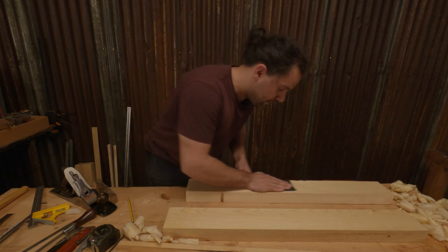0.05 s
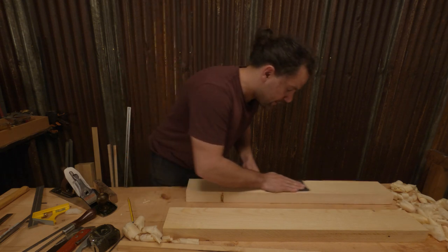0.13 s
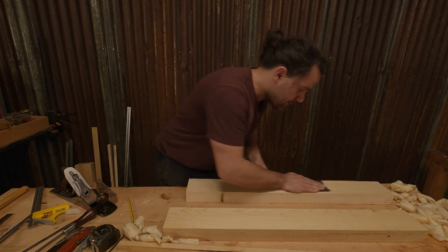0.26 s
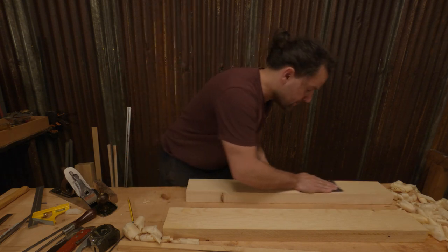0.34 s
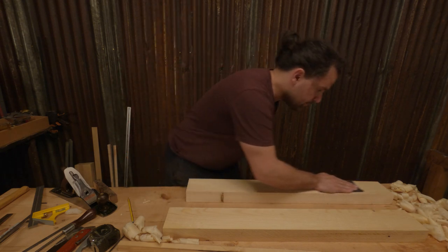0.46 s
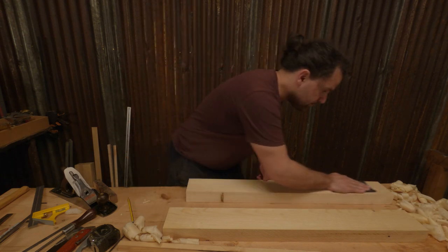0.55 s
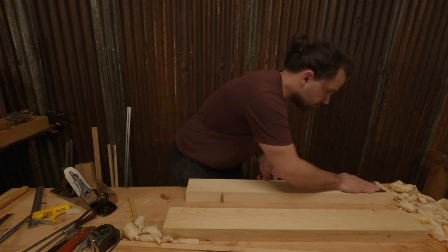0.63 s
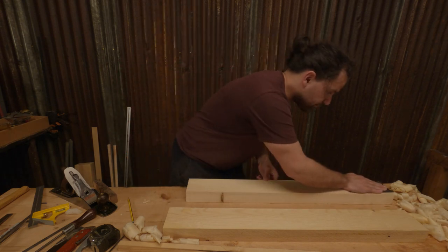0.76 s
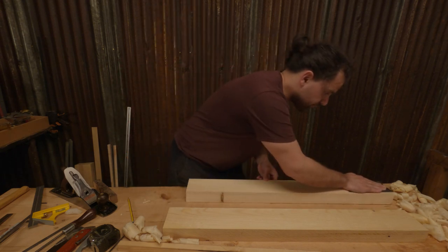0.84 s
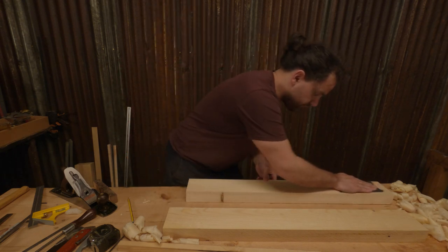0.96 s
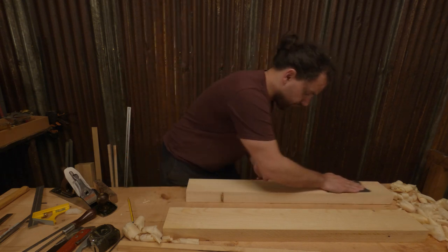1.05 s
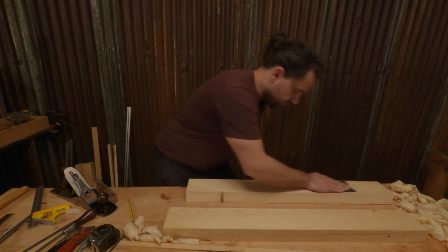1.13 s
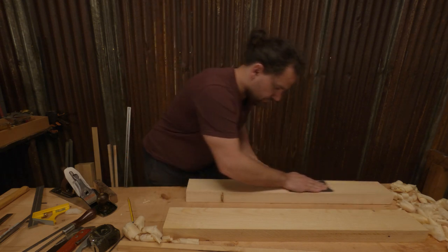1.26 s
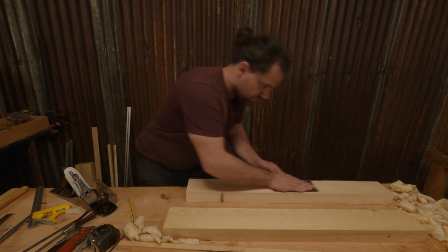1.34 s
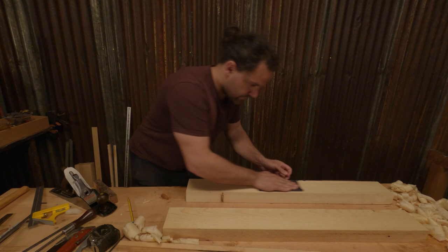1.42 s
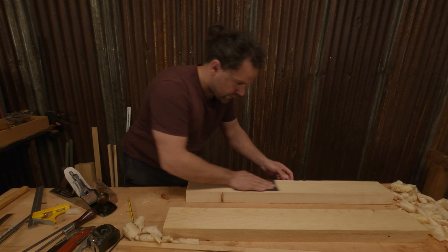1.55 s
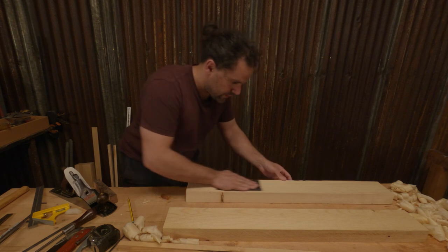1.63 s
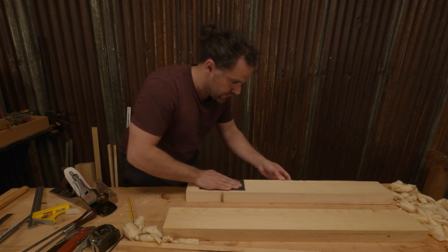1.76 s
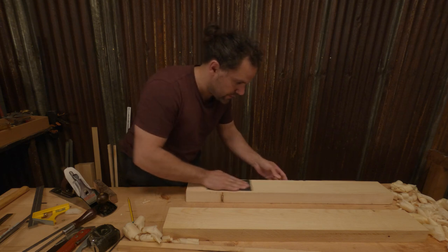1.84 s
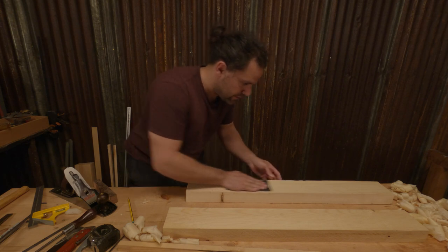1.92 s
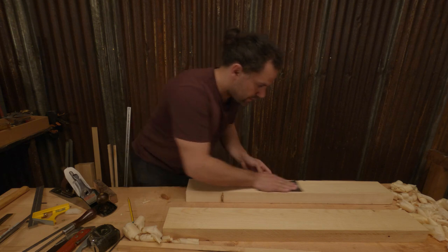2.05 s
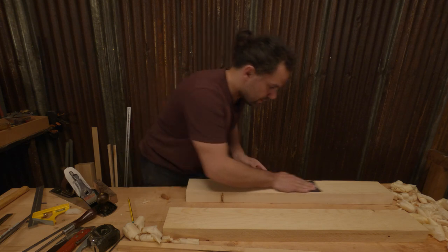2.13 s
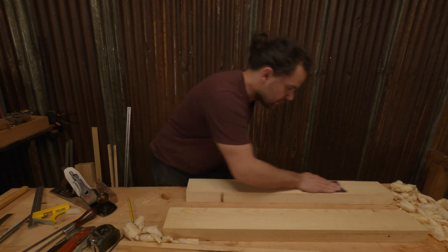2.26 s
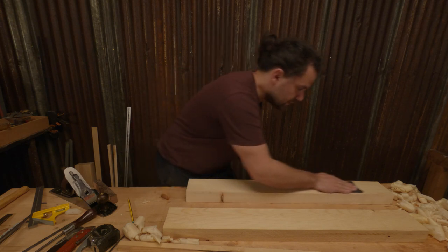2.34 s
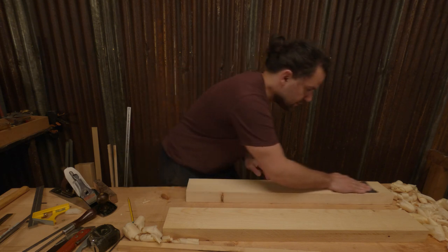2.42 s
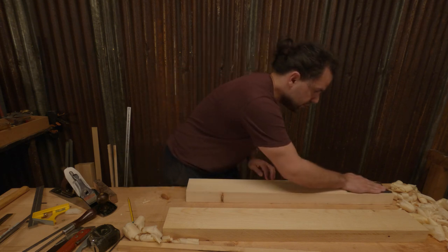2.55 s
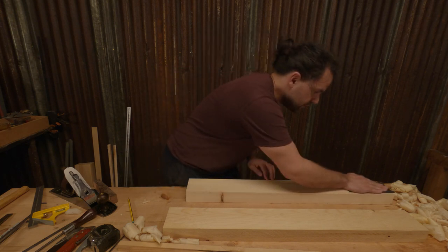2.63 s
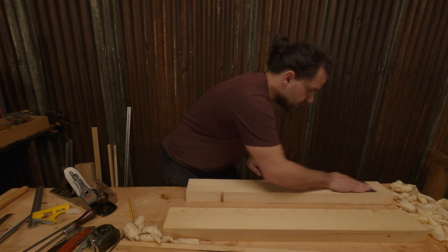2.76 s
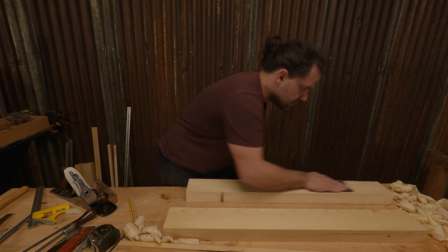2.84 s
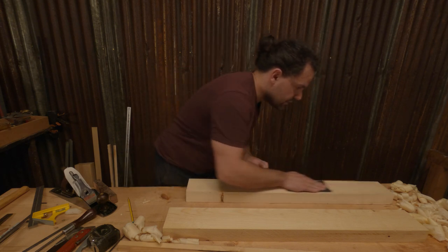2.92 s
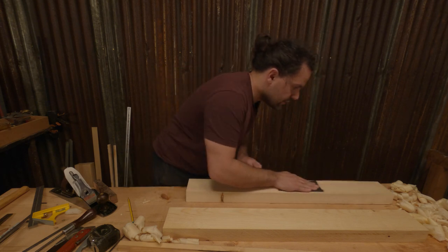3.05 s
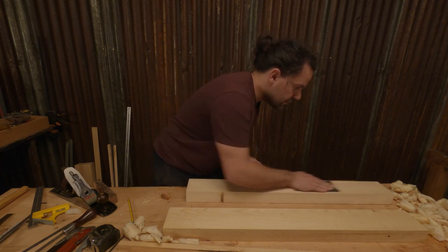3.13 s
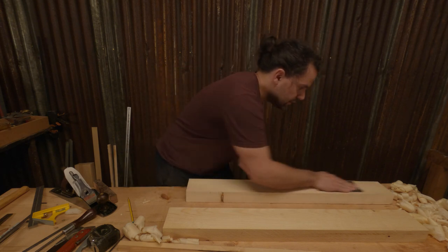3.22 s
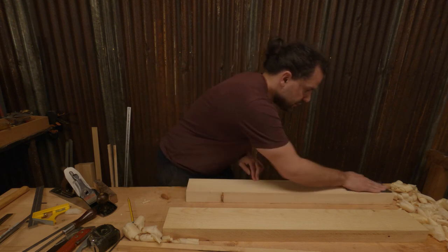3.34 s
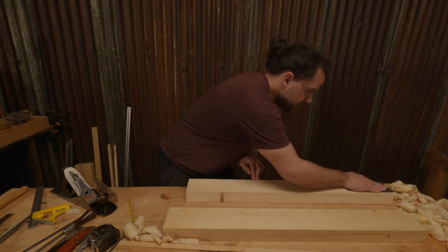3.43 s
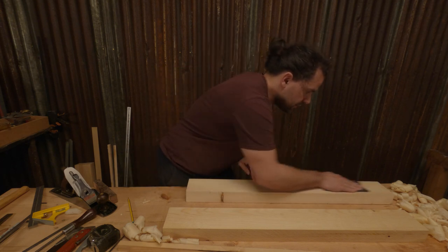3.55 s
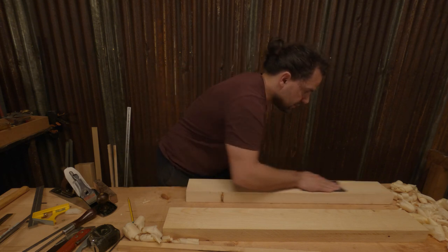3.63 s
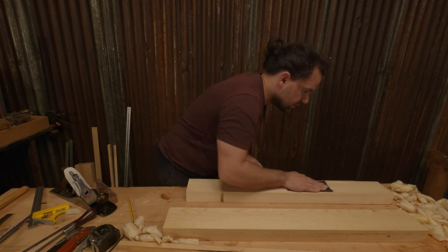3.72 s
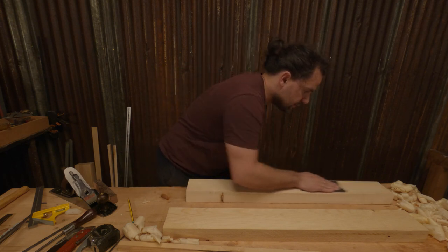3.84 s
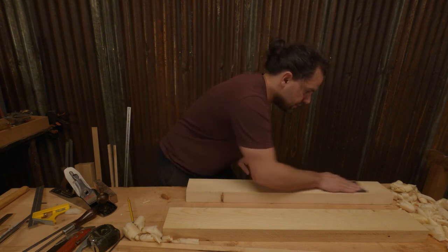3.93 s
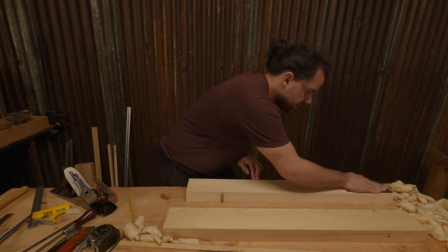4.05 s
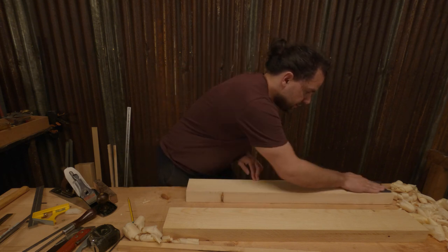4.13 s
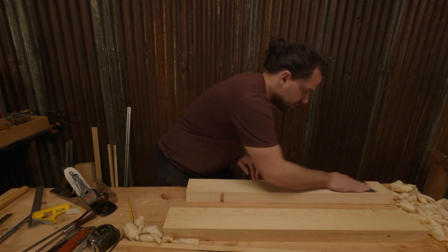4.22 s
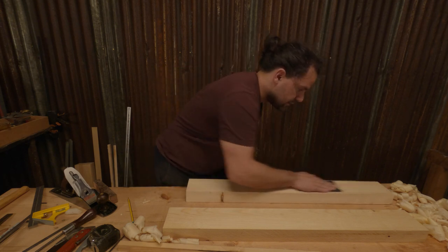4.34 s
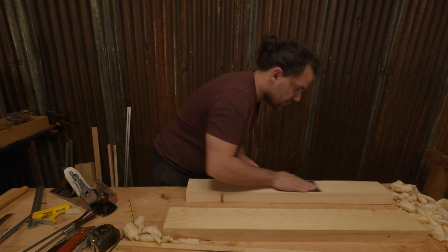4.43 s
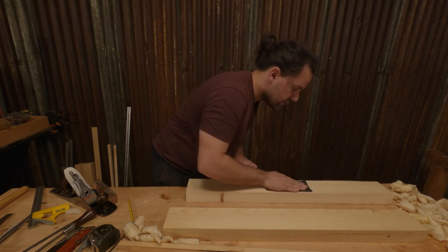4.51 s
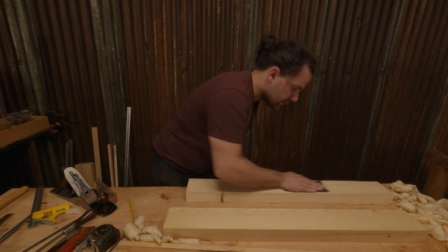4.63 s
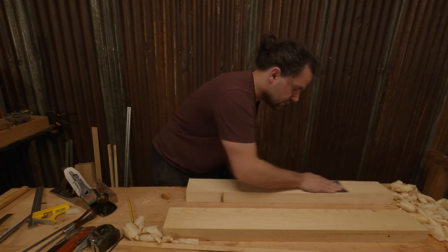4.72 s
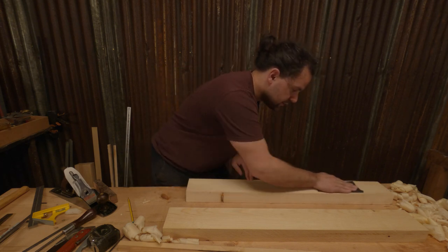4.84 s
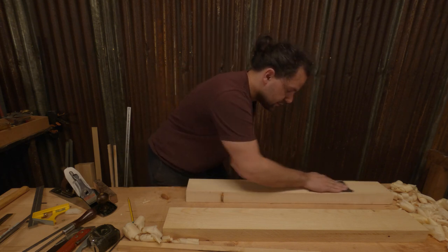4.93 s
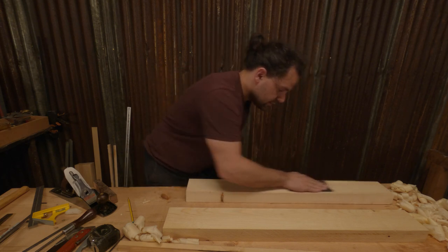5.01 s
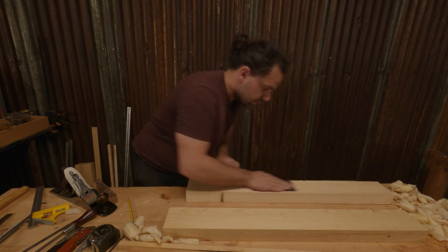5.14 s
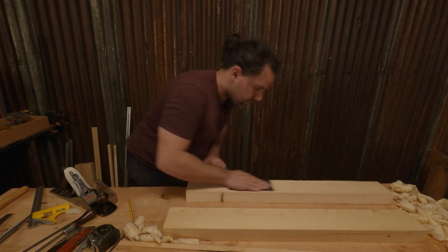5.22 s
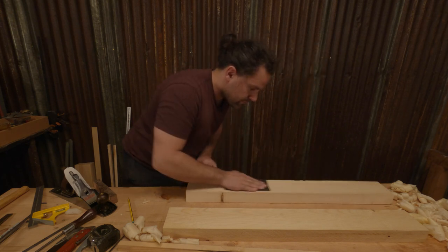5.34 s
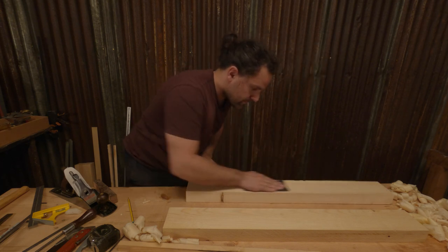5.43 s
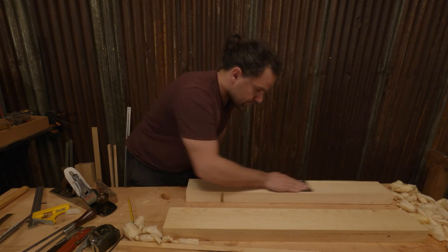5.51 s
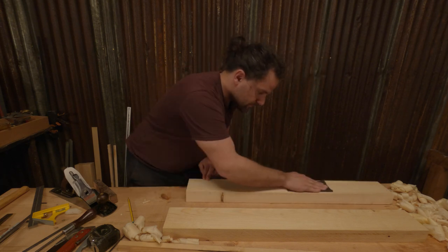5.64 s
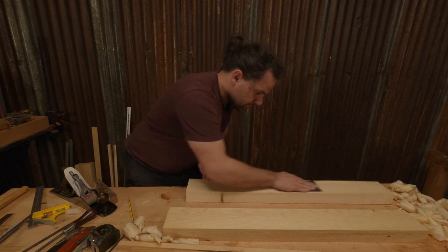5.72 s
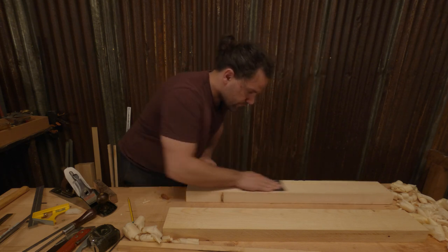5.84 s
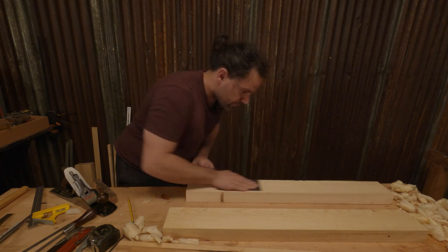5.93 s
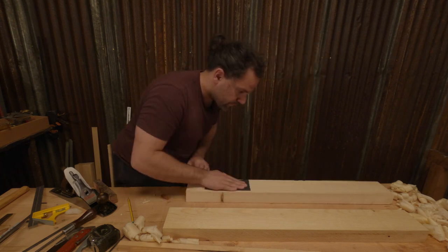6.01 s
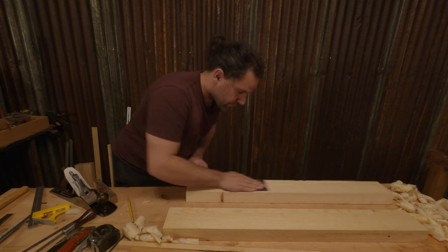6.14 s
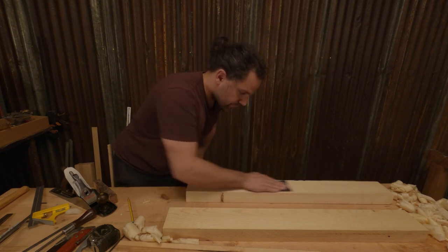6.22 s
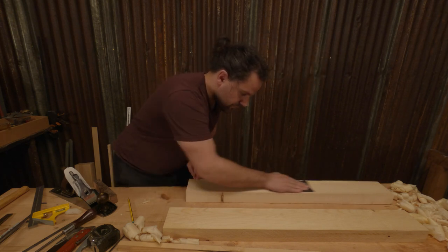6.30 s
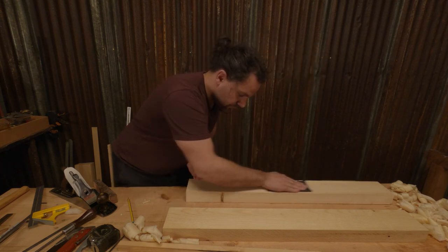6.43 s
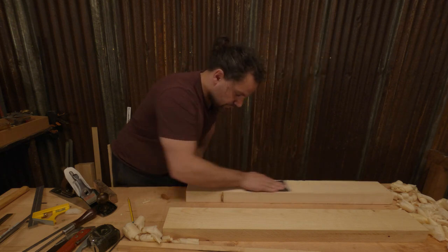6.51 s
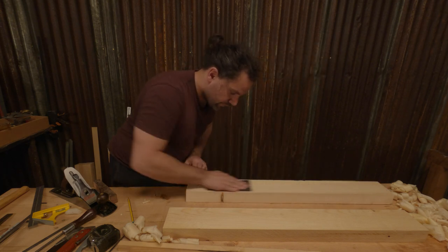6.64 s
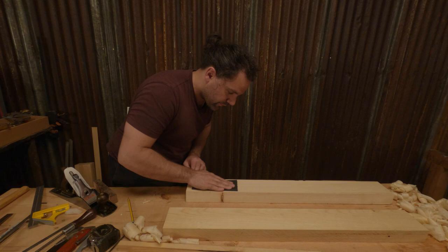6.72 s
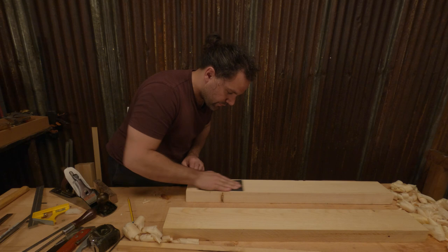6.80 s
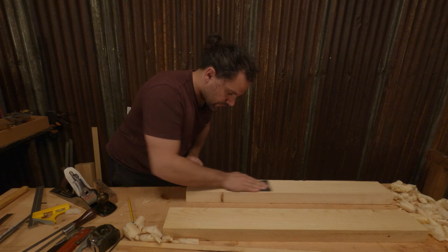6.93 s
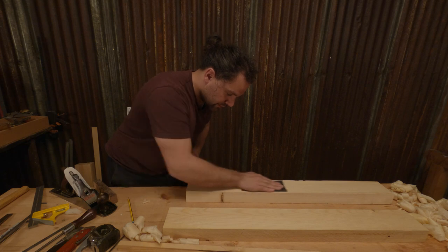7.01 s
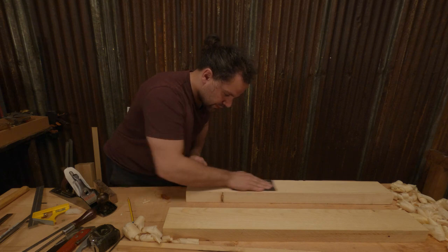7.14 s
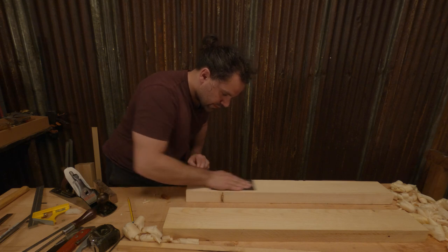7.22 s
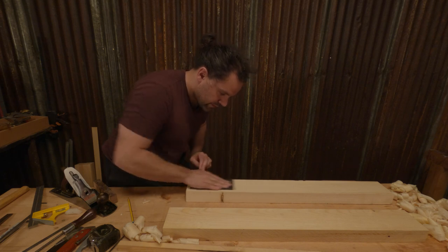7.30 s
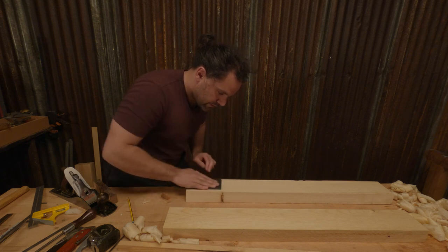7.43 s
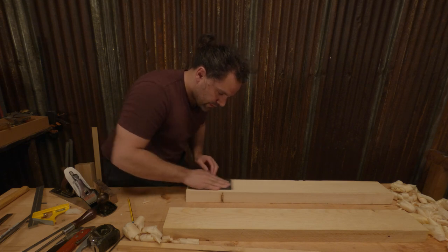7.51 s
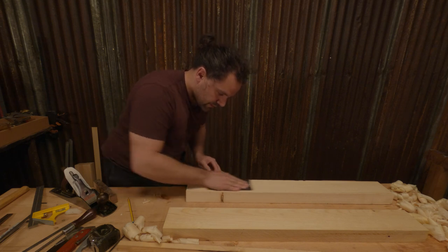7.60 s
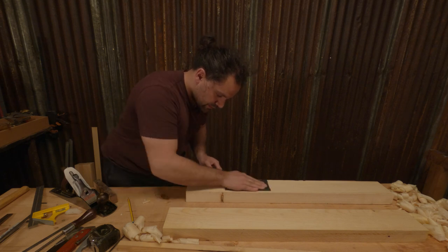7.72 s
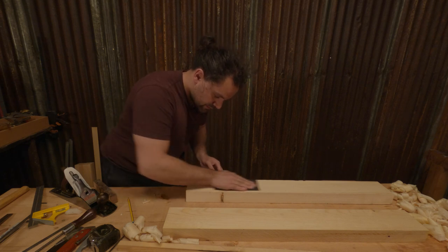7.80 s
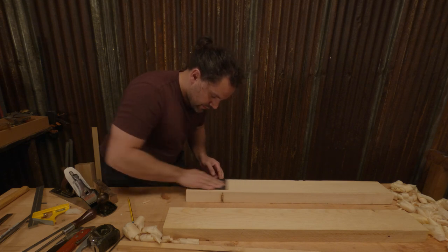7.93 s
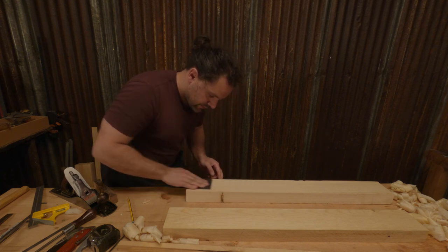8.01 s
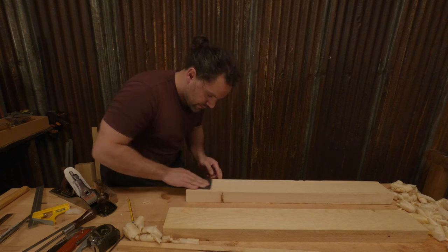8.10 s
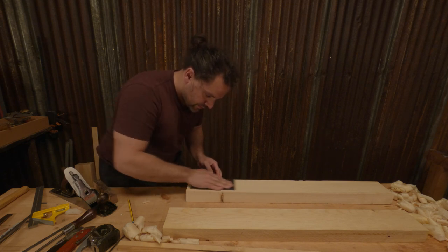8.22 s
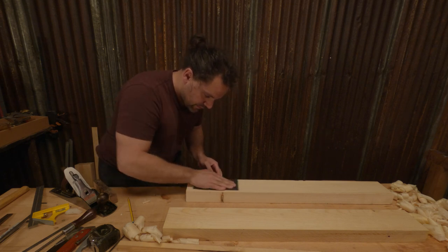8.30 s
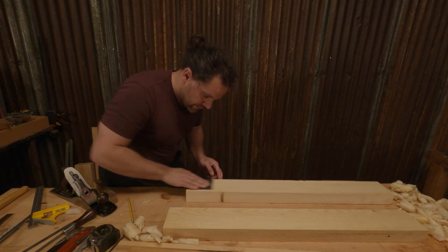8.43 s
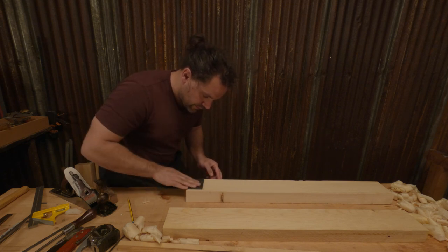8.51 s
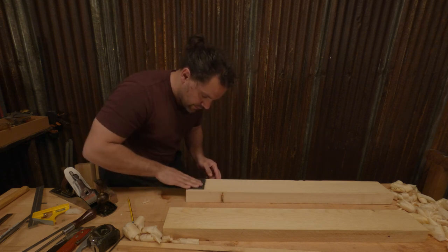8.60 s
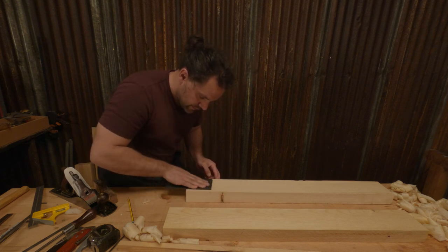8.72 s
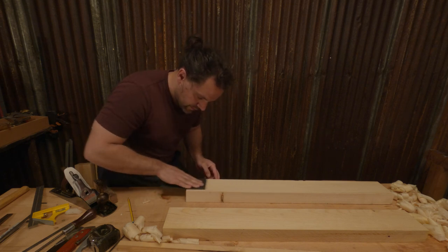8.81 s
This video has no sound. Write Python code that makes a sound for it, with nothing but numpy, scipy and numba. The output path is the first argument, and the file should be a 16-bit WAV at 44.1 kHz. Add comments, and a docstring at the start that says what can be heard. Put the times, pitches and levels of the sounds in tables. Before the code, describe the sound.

Hand-sanding timber on a workbench, heard close up in a small shed. Broad, dry, scratchy hiss swells and drops with each to-and-fro stroke, leaning slightly right on far reaches and returning to centre. The rhythm tightens from nearly second-long strokes to rapid short rubs. Low thumps and faint timber hum sit underneath, tiny bright ticks mark a few turns, and a barely audible thin whistle colours some strokes.

```python
"""In a small shed, coarse sandpaper under a flat hand is pushed to and fro along a planed timber on a bench.
The rub is noise in three grit bands over a resonant air pocket, following the hand speed and dying at each turn.
Dull thuds ring damped modes of the structure, with noise rumble and a late bench boom.
Timber hum and bench rumble are filtered noise; ticks are noise snaps, the thin whistle narrow noise bands.
Two close microphone ports listen, with a short diffuse tail and quiet air behind."""
import sys
import numpy as np
from scipy import signal
from scipy.fft import rfft, irfft
from scipy.io import wavfile
from scipy.ndimage import uniform_filter1d
from numba import njit

SR = 44100
rng = np.random.default_rng(int(sys.argv[2]) if len(sys.argv) > 2 else 0)


def magnitude_from_level(level_db):
    """Linear magnitude for a level in decibels (20 dB per decade)."""
    exponent = np.asarray(level_db, float) / 20
    return 10 ** exponent


def output_pcm(signal):
    """Save a mono or channel-first signal as 16-bit PCM at the path in sys.argv[1].

    Samples are clipped to [-1, 1] before scaling.
    """
    pcm = np.clip(np.atleast_2d(signal).T, -1, 1) * 32767
    wavfile.write(sys.argv[1], SR, np.round(pcm).astype(np.int16))


N = 390726


def level(x, db=0):
    """Scale to an rms level in dB."""
    return x * magnitude_from_level(db) / np.sqrt(np.mean(x ** 2))


def curves(rows):
    """Interpolate table columns over time, one value a sample."""
    s, *columns = np.transpose(rows)
    return [np.interp(np.arange(N) / SR, s, column) for column in columns]


def over_hz(points):
    """Interpolate (Hz, value) points over log frequency, onto the bins of the whole-length spectrum."""
    hz, value = np.transpose(points)
    return np.interp(np.log(np.arange(N // 2 + 1) * SR / N + 1), np.log(hz + 1), value)


def colour(x, points):
    """Zero-phase filter through (Hz, dB) points."""
    return irfft(rfft(x) * magnitude_from_level(over_hz(points)), N)


def walk(rate_hz):
    """Random levels held 1 / rate_hz seconds and slewed twice; spread near 1."""
    hold = int(SR / rate_hz)
    steps = np.repeat(rng.standard_normal(N // hold + 1), hold)
    return 1.09 * uniform_filter1d(uniform_filter1d(steps, hold), hold)[:N]


@njit
def svf(x, hz, width_hz):
    """State-variable band-pass with a moving centre, gain 1 at the centre."""
    y, band, low = np.empty(len(x)), 0., 0.
    for i in range(len(x)):
        g, k = np.tan(np.pi * hz[i] / SR), width_hz / hz[i]
        v = (band + g * (x[i] - low)) / (1 + g * (g + k))
        band, low, y[i] = 2 * v - band, low + 2 * g * v, k * v
    return y


# The stroke after each turn, before speed acts on it. Each row: hiss in dB, its lean from start to end in dB,
# medium grit in dB, fine grit in dB, air pocket in dB, its lean in dB, its pitch in Hz, its glide in Hz.
STROKE_ROWS = [(-29.5, 1, 2, -5, -44.5, -4, 1430, -20), (-25.5, 1.5, -2.5, -15, -38.5, 6.5, 1234, 122),
               (-29.5, -6, 3.5, -4, -45.5, -5.5, 1340, 0), (-24.5, 9, -1.5, -16, -39.5, 6, 1270, 250),
               (-26.5, -0.5, 2.5, -8.5, -41, 0, 1280, 100), (-27, 6.5, 0.5, -10.5, -41, 7, 1175, 0),
               (-27.5, 2, 1.5, -5.5, -44.5, 1, 1310, 0), (-25.5, 2.5, -1, -12.5, -43, 8, 1200, 50),
               (-27.5, 0.5, 1, -6.5, -44.5, 2, 1260, 0), (-25, 2.5, -1, -12, -41.5, 4, 1310, 8),
               (-28, -1.5, 2.5, -4, -43.5, -14, 1240, -100), (-26.5, 4, 0.5, -8.5, -42.5, 0.5, 1235, -100),
               (-29, -1, 3.5, -2.5, -47.5, -9, 1270, 50), (-26.5, 4, 0, -9, -40, 6, 1230, -50),
               (-29, 3.5, 3, -3, -44.5, -4, 1310, 100), (-26, 3.5, -0.5, -10, -41, -1, 1260, 0),
               (-27.5, -1.5, 1.5, -5, -41.5, -12, 1320, 50), (-26, 4.5, -1.5, -8.5, -38.5, 6, 1314, 300),
               (-25.5, 2.5, 0.5, -6.5, -36.5, 1, 1300, -100), (-24, 0, -3, -9, -36.5, -7, 1370, 200),
               (-26.5, -1.5, -4, -11, -43.5, 5, 1420, 0), (-27.5, -2, -2.5, -11, -41, 0, 1410, 0)]
# Where the hand turns round. Each row: time in seconds, slowing time in seconds, place as left minus right in dB.
TURN_ROWS = [(-.2, .06, -2), (0.841, 0.2, -3.5), (1.802, 0.067, -1), (2.652, 0.078, -3), (3.042, 0.068, -2),
             (3.422, 0.055, -3), (3.772, 0.061, -2.5), (4.125, 0.069, -3.5), (4.548, 0.059, -2.5),
             (4.872, 0.059, -3), (5.329, 0.059, -1.2), (5.669, 0.044, -3), (6.05, 0.052, -1.2),
             (6.399, 0.044, -3), (6.77, 0.051, -.4), (7.079, .055, -2), (7.449, 0.068, -.1),
             (7.754, 0.047, -1.5), (8.093, 0.067, .3), (8.312, 0.068, -1), (8.578, .11, .1),
             (8.761, 0.057, 0), (9, .06, 0)]
STOP_S, START_SHARE = 0.011, 0.9  # rounding of the standstill; the hand speeds up faster than it slows
HISS_SPEED_POWER, POCKET_SPEED_POWER = 1.39, 1
SAG_DB, DULLING_DB_PER_S = -6, -3.5  # the pocket rings less mid-stroke; the hiss dulls along a stroke


def hand():
    """Hand speed sets, per sample: hiss, medium and fine grit, place, level and pitch of the air pocket."""
    t = np.arange(N) / SR
    s, slow_s, _ = np.transpose(TURN_ROWS)
    k = np.clip(np.searchsorted(s, t) - 1, 0, len(STROKE_ROWS) - 1)
    speeding_up = np.tanh(np.hypot(t - s[k], STOP_S) / slow_s[k] / START_SHARE)
    slowing = np.tanh(np.hypot(s[k + 1] - t, STOP_S) / slow_s[k + 1])
    speed_db = 20 * np.log10(speeding_up * slowing)
    length_s = s[k + 1] - s[k]
    along = (t - s[k]) / length_s - .5  # -0.5 to 0.5 within a stroke
    columns = np.transpose(STROKE_ROWS)[:, k]
    hiss_db, lean_db, medium_db, fine_db, pocket_db, pocket_lean_db, pocket_hz, glide_hz = columns
    dull_db = DULLING_DB_PER_S * along * length_s
    hiss_db = hiss_db + lean_db * along + HISS_SPEED_POWER * speed_db
    sag_db = SAG_DB * (.5 - 4 * along ** 2)
    pocket_db = pocket_db + pocket_lean_db * along + sag_db + POCKET_SPEED_POWER * speed_db
    controls = [hiss_db, medium_db + dull_db, fine_db + 1.2 * dull_db,
                curves(TURN_ROWS)[1], pocket_db, pocket_hz + glide_hz * along]
    return uniform_filter1d(np.array(controls), SR // 200)


def tearing():
    """Countless fibres snap, some louder than the rest: noise with a random level each sample."""
    louder_db = 2.2 * np.minimum(rng.exponential(size=N), 5.5)
    return level(rng.standard_normal(N) * magnitude_from_level(louder_db))


# Spectrum of the torn grit hiss. Each row: frequency in Hz, relative density in dB per Hz.
GRIT_SPECTRUM = [(410, -64), (700, -23), (938, -39), (1010, -15), (1210, -13.5), (1660, -14.5), (2830, 0),
                 (3430, 4), (4360, 0.5), (6150, -1), (7640, -6), (8350, -17.5), (10600, -10.5),
                 (13200, -22), (14300, -33), (14700, -67)]


def sanding():
    """Hiss follows the hand in three grit sizes, over the ring of the air pocket; returns body and fine top."""
    stroke_db, medium_db, fine_db, _, pocket_db, pocket_hz = hand()
    pocket_db = pocket_db + 1.0 * walk(9)
    pocket_hz = pocket_hz * (1 + 0.017 * walk(6))
    hiss = colour(tearing() * magnitude_from_level(.5 * walk(60)), GRIT_SPECTRUM)
    # the paper flexes under the fingers, so its broad resonances drift
    for hz in (2730, 3430, 4800, 6670):
        hiss = hiss + .17 * walk(6) * svf(hiss, hz * (1 + .05 * walk(4)), hz / 5)
    hiss = hiss / np.std(colour(hiss, [(1500, -9), (2000, 1.5), (7000, -1.5), (8000, -13)]))
    coarse = colour(hiss, [(1500, -4.5), (2000, 1.0), (3900, -4), (4600, -13.5)])
    medium = colour(hiss, [(3900, -14.5), (4600, -2.5), (7000, -3.5), (8000, -6.5)])
    fine = level(colour(hiss, [(7000, -27.5), (8000, -6.5)]))
    # the slower the hand, the duller the hiss
    fine_db = fine_db + 0.41 * (stroke_db + 17.0)
    fibres = tearing()
    flicker = magnitude_from_level(2.5 * walk(25))
    pocket = level(svf(tearing() * flicker, pocket_hz, 108.0))
    pocket = pocket + level(svf(fibres, np.full(N, 1300.), 440.0), -1)
    # a fixed ring of the timber sits just under it
    pocket = pocket + level(svf(fibres * magnitude_from_level(3.8 * walk(6)), np.full(N, 1190.), 62.0), -9)
    pocket = level(colour(pocket, [(500, -5), (1000, -0.5), (1700, 3), (2400, 7.5)]))
    body = magnitude_from_level(stroke_db) * (coarse + magnitude_from_level(medium_db) * medium) + magnitude_from_level(pocket_db) * pocket
    return body, magnitude_from_level(stroke_db + fine_db) * fine


# Blows. Each row: nominal time in seconds, relative peak in dB, hardness in dB per octave,
# after-rumble in dB, echo share 0-1.
THUD_ROWS = [(0.854, -19, -2, -26.5, 0), (1.4, -30.5, -3, -28, 0), (2.728, -23.5, -3, -29, 0),
             (3.054, -24, -3.5, -32.5, 0.4), (3.426, -14, 0, -28.5, 0), (4.129, -16.5, 1, -26, 0.5),
             (4.906, -24.5, -3.5, -28.5, 0.1), (5.153, -26.5, -5, -27, 0)]
# Modes the thuds ring. Each row: frequency in Hz, level in dB, t60 of the after-rumble in seconds.
STRUCTURE_MODES = [(64, -12, 0.65), (80, -4, 0.69), (107.2, 0.5, 0.39), (134, 3.5, 0.54), (184.5, -2, 0.43),
                   (215, 4, 0.43), (239.7, 8.5, 0.3), (289.6, 2, 0.43), (403, -7.5, 0.51), (430, -2, 0.46),
                   (635, -3.5, 0.45), (689, -5, 0.43), (904, -1.5, 0.41), (1040, -8, .2),
                   (1200, -8.5, 0.27), (1430, -10.5, 0.29), (1770, -17, 0.13), (2270, -16, 0.15)]


def thuds():
    """A blow rings damped modes, walls and boards answer with a dense rumble; harder blows reach higher."""
    out, t = np.zeros(N + SR), np.arange(SR) / SR
    hz, db, t60_s = np.transpose(STRUCTURE_MODES)[:, :, None]
    short = SR // 3
    cycles = hz * t[:short]
    wave = np.sin(2 * np.pi * cycles)
    # each mode swells and dies within some cycles, so the deep ones come late
    ring = (1 - np.exp(-cycles / 0.92)) * np.exp(-cycles / (3.84 + hz / 900)) * wave
    # the blow itself is a short rounded burst, before the deep modes wake
    burst = np.exp(-.5 * ((t[:short] - .0045) / 0.0036) ** 2)
    swing = magnitude_from_level(-3.0) * burst * wave / (1 + (190 / hz) ** 4)
    for s, peak_db, hard_db, rumble_db, echo in THUD_ROWS:
        decay = np.exp(-np.log(1000) * t / t60_s)
        answers = magnitude_from_level(rumble_db) * rng.standard_normal(SR) * decay * np.sqrt(hz / 250)
        answers[:, 0] = 1
        # the far wall sends the blow back
        answers[:, int(.02 * SR)] = echo
        # above the contact corner a soft blow loses its treble
        gain = magnitude_from_level(db + hard_db * np.log2(1 + (hz / 400) ** 2))
        blow = np.sum(gain * signal.fftconvolve(ring, answers, axes=1)[:, :SR], axis=0)
        blow[:short] += np.sum(gain * swing, axis=0)
        # a softer contact pushes for longer and rounds the attack
        contact_samples = 8 - 16 * min(hard_db, 0)
        push = signal.windows.hann(int(contact_samples)) / (contact_samples / 2)
        blow = np.convolve(blow, push, "same")
        i = int((s + 0.00464) * SR)
        out[i:i + SR] += magnitude_from_level(peak_db) * blow / 3
    return signal.sosfilt(signal.butter(4, 58, "high", fs=SR, output="sos"), out[:N])


# Level curves. Each row: time in seconds, hum of the rubbed timber in dB, bench rumble in dB.
HUM_CURVES = [(0, -53.5, -77), (.28, -52, -79), (.47, -53, -81), (.75, -47.5, -82), (1.2, -60, -70),
              (1.8, -62.5, -68), (2.15, -56, -76), (2.4, -56.5, -71), (2.6, -53.5, -62), (3.3, -56, -59),
              (4.2, -63, -61), (4.7, -62, -66), (5.4, -54, -48), (5.8, -70, -74), (6.1, -59, -57),
              (6.75, -61.5, -55), (7.25, -65, -70), (7.6, -56, -67), (7.85, -67, -62), (8.15, -57.5, -59.5),
              (8.5, -59.5, -61), (8.7, -49, -62.5), (8.86, -60, -61)]
# Low timber modes. Each row: centre in Hz, width in Hz, level in dB.
TIMBER_MODES = [(226.5, 23, 9), (292, 65, 2.5), (390, 78, -11.5)]
BOOM_DB, BOOM_PEAK_S = -34.5, 0.11  # the bench booms late after each thud


def timber():
    """Rubbing keeps low modes of timber and bench trembling, each swelling on its own; thuds add a late boom."""
    hum_db, rumble_db = curves(HUM_CURVES)
    # the hum sags when the hand turns
    hum_db = hum_db + 0.14 * (hand()[0] + 28)
    shake = tearing()
    hum = np.zeros(N)
    for hz, width_hz, db in TIMBER_MODES:
        swell = magnitude_from_level(db + 3.8 * walk(8))
        hum = hum + swell * svf(shake, hz * (1 + 0.056 * walk(4)), 1. * width_hz)
    hum = colour(hum, [(100, -24), (180, 1.5), (450, -2.0), (700, -6)])
    rumble = rng.standard_normal(N) * magnitude_from_level(2.7 * walk(6.2))
    rumble = colour(rumble, [(15, -18), (30, -2.5), (65, 4.5), (120, -2.0), (200, -24)])
    blows = np.array(THUD_ROWS)
    late = np.maximum(np.arange(N) / SR - blows[:, :1], 0) / BOOM_PEAK_S
    boom_gain = magnitude_from_level(blows[:, 1] + BOOM_DB) @ (late * np.exp(1 - late)) ** 3
    boom = boom_gain * level(colour(rumble, [(40, -25), (64, 0), (95, -12)]))
    return level(hum) * magnitude_from_level(hum_db) + level(rumble) * magnitude_from_level(rumble_db) + boom


# The paper bites. Each row: time in seconds, level before colouring in dB.
TICK_ROWS = [(0.8637, -28), (1.819, -37), (2.6816, -37), (6.7847, -31), (7.4712, -30), (8.1137, -23),
             (8.7752, -26)]


def ticks():
    """Short bright snaps as the paper catches: noise decaying in 1.5 ms."""
    out, t = np.zeros(N), np.arange(400) / SR
    for s, db in TICK_ROWS:
        i = int(s * SR)
        out[i:i + 400] += magnitude_from_level(db) * rng.standard_normal(400) * np.exp(-t / .0015)
    return colour(out, [(2000, -20), (6000, -5), (11000, -2), (14500, -20)])


# A thin whistle on some strokes. Each row: start in seconds, length in seconds, pitch in Hz, base level in dB.
WHISTLE_ROWS = [(0.096, .65, 692, -61.5), (1.998, 0.45, 683, -65), (4.546, 0.46, 673, -65)]
WHISTLE_PEAK = 0.29  # loudest at this share of its length


def whistle():
    """A narrow breathy tone with its octave, swelling and fading: band-passed noise."""
    out, t = np.zeros(N), np.arange(N) / SR
    for s, length_s, hz, db in WHISTLE_ROWS:
        fade = np.interp((t - s) / length_s, [0, WHISTLE_PEAK, 1], [0, 1, 0]) ** 2
        for k, share_db in ((1, 7.5), (2, 2)):
            tone = svf(rng.standard_normal(N), np.full(N, 1. * k * hz), 18. * k)
            out = out + fade * magnitude_from_level(db + share_db) * level(tone)
    return out


# Spectrum of the quiet air. Each row: frequency in Hz, relative density in dB per Hz.
SHED_SPECTRUM = [(30, 4), (100, -4), (200, 2.5), (450, -15.5), (800, -28), (3000, -11), (7000, -10),
                 (14000, -40)]


def shed_air():
    """Quiet air of the shed: steady coloured noise."""
    return level(colour(rng.standard_normal(N), SHED_SPECTRUM), -61)


def room(x):
    """Diffuse tail of the shed, duller than the direct sound: decaying noise, different at each port."""
    t60_s, tail_db = 0.17, -9
    t = np.arange(SR // 2) / SR
    tail = rng.standard_normal((2, len(t))) * np.exp(-np.log(1000) * t / t60_s) * (t > .006)
    tail = tail / np.linalg.norm(tail[0])
    wet = colour(x, [(1000, -1), (4000, -4.0), (7000, 0), (10000, -4.5)])
    return magnitude_from_level(tail_db) * signal.fftconvolve(wet[None], tail, axes=1)[:, :N]


# Phase between the ports. Each row: frequency in Hz, lead of the left in radians.
PORT_LEAD_CURVE = [(0, 0.053), (690, -0.35), (4480, -0.66), (7320, 0.24), (11800, 0.15), (12300, 1),
                   (13200, 0.086), (14300, 0.0)]
# Level between the ports. Each row: frequency in Hz, left minus right in dB.
PORT_TILT_CURVE = [(60, 1.5), (110, -3.5), (200, 0), (370, -1), (680, -1), (1250, -1.5), (2290, -1.5),
                   (4200, -1.5), (7720, -1), (14200, 3)]
# Unrelated share at the ports. Each row: frequency in Hz, level in dB.
DIFFUSE_CURVE = [(100, -13), (500, -7), (1000, -17), (3000, -14), (7000, -14.5), (9500, -16), (10500, -49),
                 (11500, -13), (12500, -5), (14000, -10)]


def ports(x, unrelated):
    """Two close ports: direct sound arrives shifted and tilted, a diffuse share enters with opposite signs."""
    lead = np.interp(np.arange(N // 2 + 1) * SR / N, *np.transpose(PORT_LEAD_CURVE))
    half = np.exp(.5j * lead) * magnitude_from_level(over_hz(PORT_TILT_CURVE) / 2)
    direct = irfft(rfft(x) * np.array([half, 1 / half]), N)
    return direct + colour(unrelated, DIFFUSE_CURVE) * np.array([[1], [-1]])


def scene():
    """Rub, thuds, timber, ticks and whistle at the ports, with the room tail and the quiet air of the shed."""
    body, top = sanding()
    scattered = sum(sanding())
    place_db = hand()[3]
    # the diffuse share grows as the hand moves away to the right
    diffuse_db = -5 - 2.3 * place_db
    # the body of the hiss moves sideways with the hand
    swing = magnitude_from_level(np.array([[.5], [-.5]]) * (place_db - np.mean(place_db)))
    background, unrelated = [shed_air() + timber() for _ in range(2)]
    events = thuds() + whistle() + ticks()
    rub = swing * ports(body, magnitude_from_level(diffuse_db) * scattered) + room(body + top)
    return rub + ports(top + events + background, unrelated + room(events)[0])


def band_limit(x):
    """A steep low-pass at the top of the band."""
    return signal.sosfilt(signal.butter(12, 14460, fs=SR, output="sos"), x)


def record(dry):
    """Store the finished two-port mix."""
    return band_limit(dry)


dry = scene()
out = record(dry)
output_pcm(out)
```